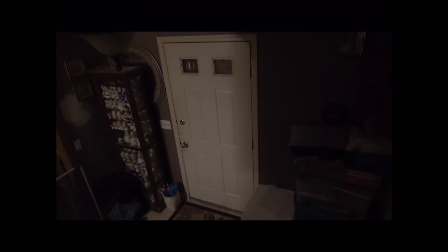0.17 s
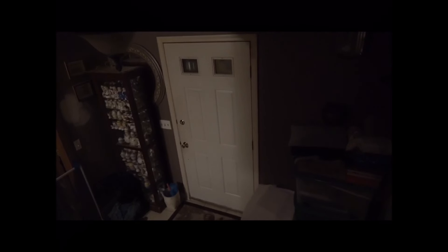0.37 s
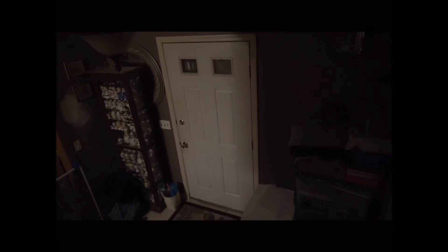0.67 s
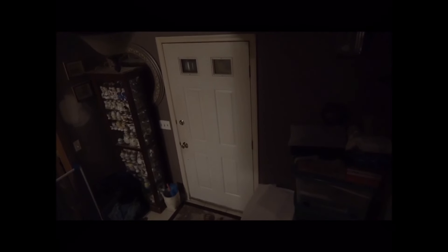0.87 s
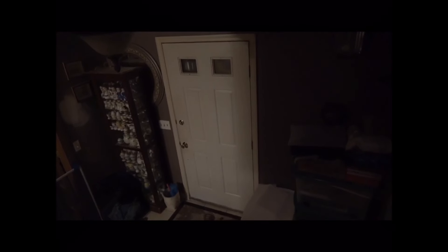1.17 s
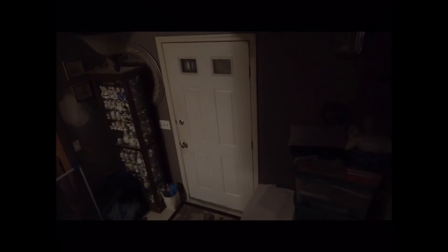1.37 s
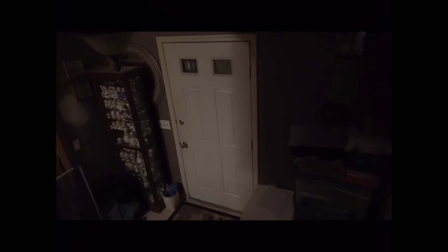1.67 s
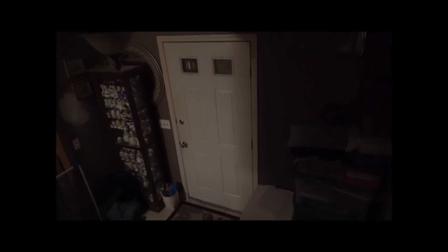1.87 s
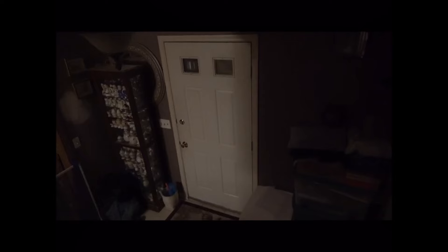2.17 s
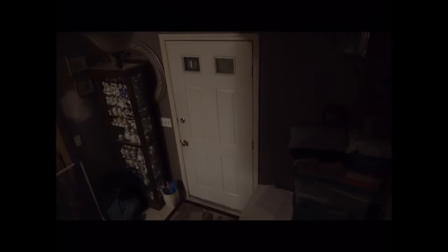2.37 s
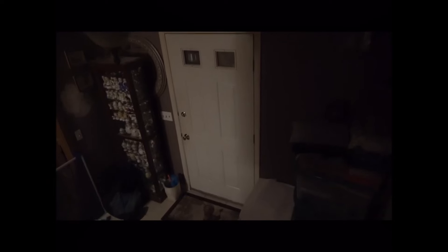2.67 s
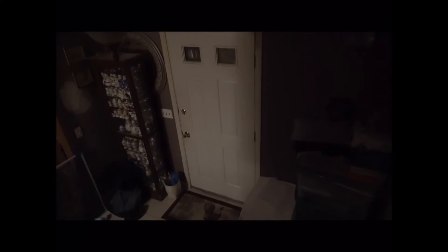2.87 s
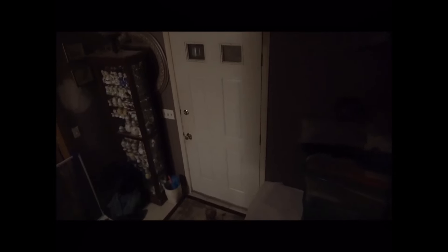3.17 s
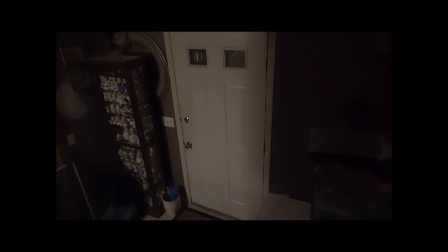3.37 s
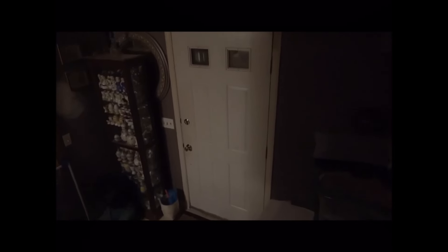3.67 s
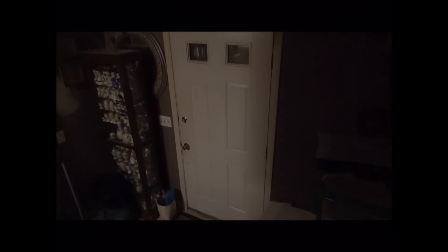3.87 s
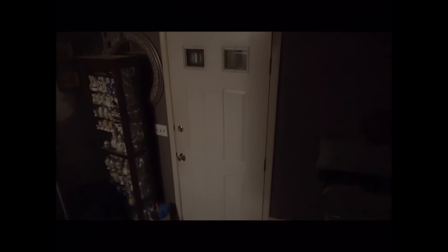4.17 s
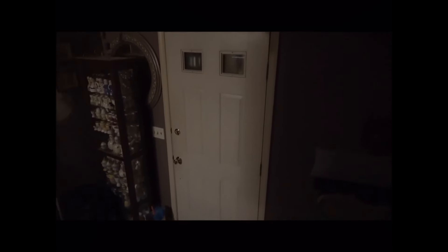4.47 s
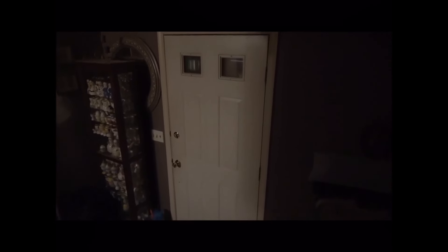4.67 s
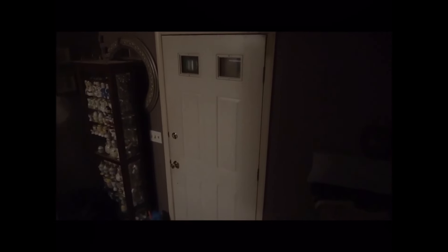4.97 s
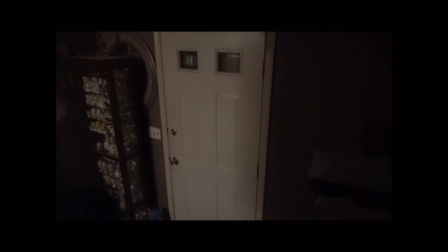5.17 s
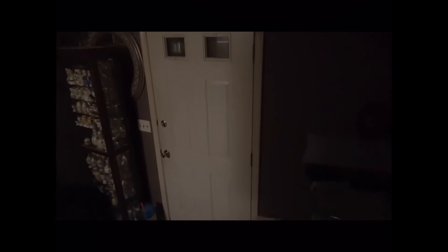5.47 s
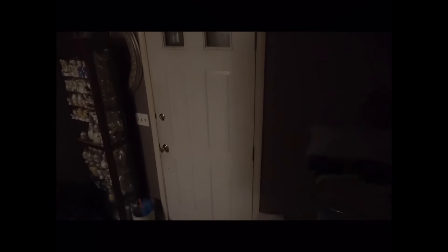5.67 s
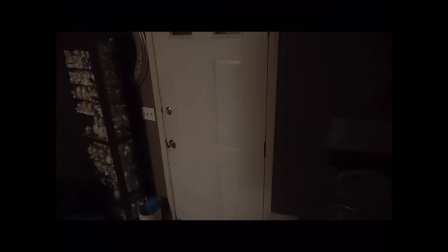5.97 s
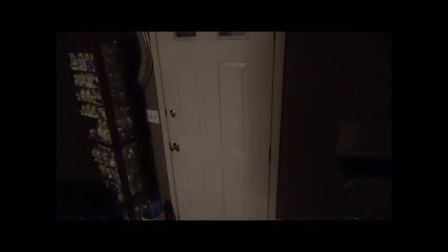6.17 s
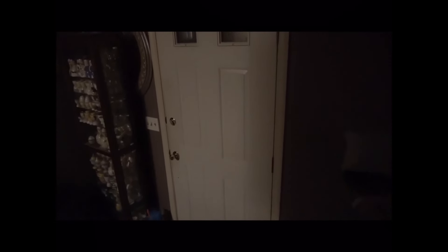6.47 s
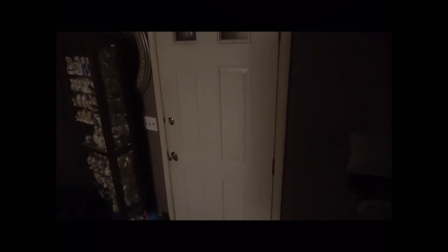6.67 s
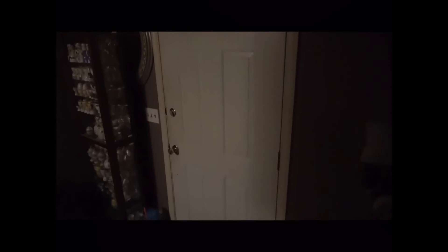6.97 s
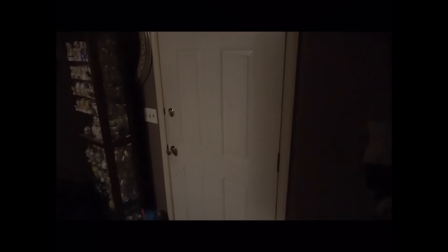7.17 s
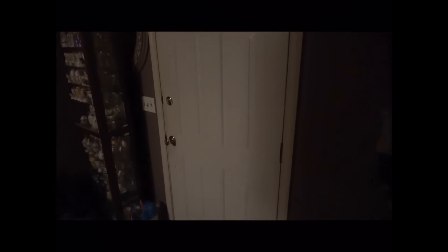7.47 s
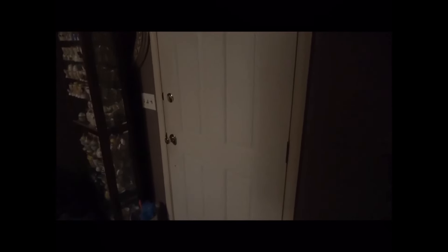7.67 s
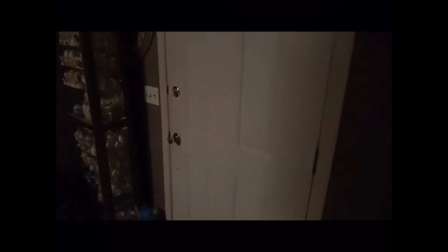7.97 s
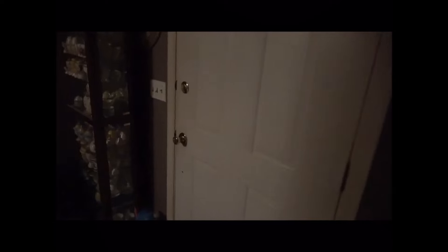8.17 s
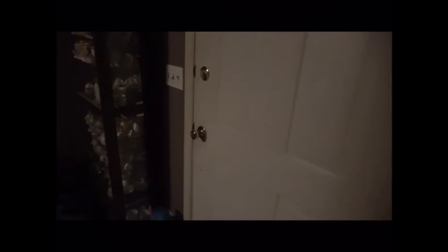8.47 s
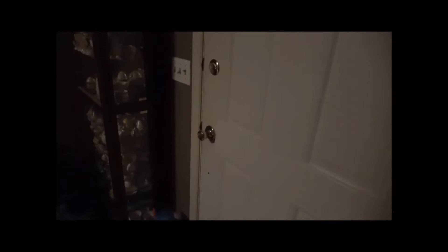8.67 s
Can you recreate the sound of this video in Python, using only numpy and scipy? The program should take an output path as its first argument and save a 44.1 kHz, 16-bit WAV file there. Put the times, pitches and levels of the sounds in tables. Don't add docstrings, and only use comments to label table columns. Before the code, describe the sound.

In a quiet house at night a distant fan hums softly under faint hiss. Knuckles knock on a hollow wooden door in three sets of three, about half a second apart, each with a low boom, woody ring and slight latch rattle. Between sets the listener walks closer with a handheld microphone, making soft steps, cloth rustle and small floor ticks. A single knock begins a fourth set at the end.

```python
import sys
import numpy as np
from scipy import signal
from scipy.fft import rfft, irfft, next_fast_len
from scipy.io import wavfile
from scipy.ndimage import uniform_filter1d, minimum_filter1d, map_coordinates

SR = 44100
rng = np.random.default_rng(int(sys.argv[2]) if len(sys.argv) > 2 else 0)


def bounce(signal):
    frames = np.transpose(np.atleast_2d(signal))
    limited = np.clip(frames, -1, 1)
    pcm = np.round(limited * 32767).astype(np.int16)
    wavfile.write(sys.argv[1], SR, pcm)


def voltage_ratio(level):
    return 10 ** (np.asarray(level, float) / 20)


N = 388521

# frequency in Hz, likeness 0 to 1.
CONTACT_ALIKE = [(200, 0.84), (600, 1), (1300, 0.99), (2800, 0.82), (5500, 0.71), (8000, 0.45),
                 (14000, 0.68)]
SIDES = np.array([[.5], [-.5]])


def unit(x):
    return x / np.sqrt(np.mean(x ** 2) + 1e-20)


def along(points, hz):
    f, v = np.transpose(points)
    return np.interp(np.log(hz + 1), np.log(f + 1), v)


def wobble(rate_hz):
    at = np.arange(0, N + 64, 64)
    knots = rng.standard_normal(int(N / SR * 40) + 4)
    slow = map_coordinates(knots, [at * min(rate_hz, 40) / SR])
    return np.interp(np.arange(N), at, slow)


def rush(spectrum, alike, size, lean=((1000, 0),)):
    hz = np.fft.rfftfreq(size, 1 / SR)
    turn = np.arccos(np.clip(along(alike, hz), -1, 1)) / 2
    noise = rfft(rng.standard_normal((2, size))) * voltage_ratio(along(spectrum, hz))
    mid, side = noise * [np.cos(turn), np.sin(turn)]
    pair = [mid + side, mid - side] * voltage_ratio(along(lean, hz) * SIDES)
    return unit(irfft(pair, size))


def bell(centre_hz, width_hz):
    hz = np.geomspace(50, 16000, num=300)
    peak_db = -10 * np.log10(1 + ((hz * hz - centre_hz ** 2) / (hz * width_hz)) ** 2)
    return np.transpose([hz, 1.57 * peak_db - 10 * (hz / 12000) ** 2])


def add(track, sound, s):
    part = track[:, round(s * SR):][:, :sound.shape[1]]
    part += sound[:, :part.shape[1]]


def background(spectrum, alike):
    return rush(spectrum, alike, next_fast_len(N))[:, :N]


def fan(t, opening_db, air_alike):
    # frequency in Hz, density in dB per Hz.
    blade_noise = [(100, -10), (170, -6.5), (246, -3.5), (266, -7.5), (285, -7), (470, -3), (516, -6.5),
                   (613, -5), (637, -8.5), (708, -2.5), (986, -11), (1250, -10.5), (4000, -37.5),
                   (5200, -34), (8800, -120)]
    # frequency in Hz, level in dB.
    motor_tones = [(86.1, -64), (118.4, -61), (242.2, -65), (479.1, -63.5), (597.5, -66), (694.4, -63.5),
                   (1270, -67.5)]
    level_db = -49.5 + opening_db + 0.38 * wobble(3.2) + 0.73 * wobble(1.56)
    blades = voltage_ratio(level_db) * background(blade_noise, air_alike)
    tones = 0
    for hz, db in motor_tones:
        phase = 2 * np.pi * hz * t + 1.01 * wobble(9)
        tones = tones + voltage_ratio(db + 1.4 * wobble(3.9)) * np.sin(phase)
    return blades + voltage_ratio(opening_db + 4) * tones


def footfalls(t, opening_db, air_alike):
    # time in seconds, hand jolt in dB, floor rumble in dB, both over standing level.
    steps = [(.52, 8, -4), (.93, 1, -7), (2.8, 1, -3), (3.12, 8, 2), (3.33, 16, -0.5), (5.1, 2, 4.5),
             (5.35, -8, 2), (5.7, 13, 3), (6.08, 9, 0), (7.55, 5, 0), (7.9, 7, -1), (8.2, 1, 0),
             (8.48, 4, 2)]
    # frequency in Hz, density in dB per Hz.
    hand_shake = [(12, -43), (22, -4), (45, -6), (65, 2), (100, -62.5)]
    # frequency in Hz, density in dB per Hz.
    floor_rumble = [(32, -49), (55, -9), (75, -10.5), (124, 6), (183, -8.5), (200, -16), (260, -58),
                    (440, -120)]
    half_length_s = 0.15
    coarse_s = t[::64]
    swells = 0
    for s, *db in steps:
        swells = swells + np.outer(db, np.exp(-((coarse_s - s) / half_length_s) ** 2))
    jolt_db, rumble_db = (np.interp(t, coarse_s, swell) for swell in swells)
    shake = voltage_ratio(-71 + jolt_db + 1.7 * wobble(4.9)) * background(hand_shake, [(30, 0.91)])
    level_db = -55 + 0.46 * opening_db + rumble_db - 2.5
    return shake + voltage_ratio(level_db) * background(floor_rumble, air_alike)


def clothes(t, air_alike):
    # time in seconds, clothes level in dB.
    motion = [(0, -72), (.9, -73), (2.4, -66), (2.85, -61), (2.95, -65), (3.3, -59), (3.6, -64), (4.9, -65),
              (5.1, -60), (5.45, -65.5), (5.65, -57.5), (6.05, -60.5), (6.2, -63.5), (7.5, -62.5),
              (7.8, -60), (8.15, -63.5), (8.36, -62), (8.8, -66)]
    # frequency in Hz, density in dB per Hz.
    fabric = [(880, -42), (1500, -21), (1690, -3.5), (1880, -6.5), (9620, -17.5), (14900, -23),
              (15500, -38)]
    at_s, level_db = np.transpose(motion)
    rustle_db = np.interp(t, at_s, level_db) + 1.0 * wobble(12)
    return voltage_ratio(rustle_db) * background(fabric, air_alike)


def microphone_hiss(air_alike):
    # frequency in Hz, density in dB per Hz.
    hiss = [(880, -36), (1500, -20), (2240, -9), (2720, -10.5), (3190, -10.5), (5200, -14.5), (7180, -19),
            (15500, -23)]
    return voltage_ratio(-69.5 + 2.0) * background(hiss, air_alike)


def house():
    # frequency in Hz, likeness 0 to 1.
    air_alike = [(60, 1), (200, 0.82), (640, 0.86), (1410, 0.93), (3100, 0.85), (5500, 0.66), (7000, 0.25),
                 (15000, 0.21)]
    t = np.arange(N) / SR
    opening_db = -4.5 * np.exp(-t / 1.42)
    moving = footfalls(t, opening_db, air_alike) + clothes(t, air_alike)
    return moving + fan(t, opening_db, air_alike) + microphone_hiss(air_alike)


def scuffs():
    # start in seconds, level in dB, centre in Hz, width in Hz, t60 in seconds.
    floor_noises = [(0.278, -57, 900, 900, .04), (2.395, -47, 1100, 1500, 0.11),
                    (2.413, -44, 370, 200, 0.1), (2.545, -45, 440, 120, .07),
                    (2.56, -56.5, 2200, 120, 0.17), (2.858, -53, 2850, 150, .1),
                    (3.2854, -32.5, 700, 550, 0.015), (3.286, -39, 4000, 8000, .013),
                    (3.36, -41, 320, 310, 0.038), (4.42, -40.5, 400, 440, 0.13),
                    (5.877, -40.5, 1600, 510, .03), (7.594, -39.5, 1100, 400, 0.11),
                    (7.592, -49, 4000, 6600, 0.18), (7.62, -44.5, 2030, 220, 0.076),
                    (7.622, -48, 3100, 6800, .09), (7.806, -44, 550, 450, 0.22), (7.66, -50, 302, 300, .6),
                    (7.74, -60, 3430, 200, 0.99), (7.82, -63, 3450, 250, .6), (7.44, -48, 700, 250, 0.064),
                    (7.869, -48, 71, 40, 0.2), (7.89, -56, 480, 250, 0.061)]
    # start in seconds, level in dB.
    contacts = [
        (4.393, -36),
        (4.403, -35.5),
        (4.423, -48),
    ]
    # centre in Hz, width in Hz, level in dB.
    resonances = [(990, 900, -7), (2540, 150, -7.5), (3100, 290, -8), (4540, 300, -11), (7000, 280, -13),
                  (5000, 11000, -3.5)]
    out, t = np.zeros((2, N)), np.arange(8192) / SR

    def puff(s, db, centre_hz, width_hz, rise_s, t60_s):
        noise = rush(bell(centre_hz, width_hz), CONTACT_ALIKE, len(t))
        add(out, voltage_ratio(db - 60 * t / t60_s) * (1 - np.exp(-t / rise_s)) * noise, s)

    for s, db, centre_hz, width_hz, t60_s in floor_noises:
        puff(s, db, centre_hz, width_hz, 0.017 * t60_s, t60_s)
    for s, db in contacts:
        for centre_hz, width_hz, level_db in resonances:
            puff(s, db + level_db + rng.normal(0, 1.7), centre_hz, width_hz, 0.0023, 0.16)
    return out


def low_boom(t, boom_db, slab_db):
    mode_hz = [30.5, 72, 86, 98, 124, 137, 153.5, 210, 225, 239.5, 278, 352]
    # level in dB, t60 in seconds, build-up in seconds, left-right difference in dB.
    modes = [(-22.5, 0.7, .04, 1), (-10, 0.46, 0.066, -4), (1, 0.28, 0.01, 0.5), (-9, 0.36, 0.013, 1),
             (-1, 0.55, 0.039, 4), (7, 0.19, 0.024, 2), (3.5, 0.4, 0.04, 3), (-1.5, 0.202, 0.011, 3),
             (-24, 0.16, 0.028, -6), (-6, 0.36, 0.01, 5.5), (-17, 0.16, 0.013, 22), (-2.5, 0.21, 0.017, -1)]
    push_lag_s = .0026
    boom = 0
    for hz, (level_db, t60_s, rise_s, pan_db) in zip(mode_hz, modes):
        source_db = boom_db if hz < 180 else slab_db
        start_db = level_db + source_db + rng.normal(0, 0.87) + pan_db * SIDES
        envelope = voltage_ratio(start_db - 60 * t / t60_s) * (1 - np.exp(-t / rise_s)) ** 2
        boom = boom + envelope * np.cos(2 * np.pi * hz * (t - push_lag_s))
    return boom


def panel_modes(t):
    # frequency in Hz, level in dB, t60 in seconds.
    modes = [(529, -9, 0.41), (660, 4, 0.067), (657, -30, 0.38), (800, -7, 0.39), (866, -5, 0.34),
             (846, -7.5, 0.091), (1124, -8, 0.26), (1020, -19, 0.39), (1112, 3.5, 0.26), (1220, 8, 0.18),
             (1301, 3, 0.16), (1360, 4, 0.12), (1620, -23.5, 0.14), (1590, -7.5, 0.29), (1798, -8.5, 0.2),
             (2280, -11.5, 0.14)]
    panel = 0
    for hz, level_db, t60_s in modes:
        start_db = level_db + rng.normal(0, 2.3) + rng.normal(1.6, 0.91) * SIDES
        cycles = hz * rng.normal(1, 0.0056) * t + rng.random()
        phase = 2 * np.pi * cycles + rng.normal(0, 0.66) * SIDES
        panel = panel + voltage_ratio(start_db - 60 * t / t60_s) * np.sin(phase)
    return panel


def hall_ring(t, colour, lean):
    # frequency in Hz, t60 in seconds.
    hall_decay = [(200, 0.29), (600, 0.22), (1200, 0.32), (3000, 0.22), (8000, 0.26), (15000, 0.2)]
    noise = rush([(70, -59), *colour], CONTACT_ALIKE, len(t), lean)
    hz, frame_s, z = signal.stft(noise, SR, nperseg=256)
    fade = voltage_ratio(-60 * frame_s / along(hall_decay, hz)[:, None])
    return signal.istft(z * fade, SR, nperseg=256)[1][:, :len(t)]


def hollow_swell(t, swell_hz, lean):
    noise = rush(bell(swell_hz, 307), CONTACT_ALIKE, len(t), lean)
    return noise * (t / 0.053) ** 2 * np.exp(-2 * t / 0.035)


def knuckle_snap(t):
    colour = [(500, -20), (1500, 16), (5000, -4), (10000, -12), (15000, -30)]
    snap = rush(colour, CONTACT_ALIKE, len(t)) * voltage_ratio(-60 * t / 0.015)
    crack = rush(bell(2500, 1700), CONTACT_ALIKE, len(t)) * voltage_ratio(-60 * t / 0.27)
    crack = crack * (1 - np.exp(-t / 0.0014))
    return voltage_ratio(-10) * snap + voltage_ratio(-12.5) * crack


def wall_bumps(t):
    # delay in seconds, level in dB.
    echoes = [
        (.035, 2),
        (.048, -1),
        (.061, -3),
    ]
    bumps = 0
    for lag_s, level_db in echoes:
        after_s = t - lag_s
        shape = (1 - (after_s / 0.0011) ** 2) * np.exp(-.5 * (after_s / 0.00074) ** 2)
        bumps = bumps + voltage_ratio(level_db) * shape
    return voltage_ratio(3 + 0.98 * SIDES) * bumps


def frame_shake(t, lean):
    colour = [(100, -8), (280, 8.5), (600, -11), (1100, -0.5), (2000, -18), (15000, -49.0)]
    swell = np.sin(np.pi * np.clip(t / 0.053, 0, 1)) ** 2
    return rush(colour, CONTACT_ALIKE, len(t), lean) * swell


def door():
    blows_s = [
        1.0474,
        1.4774,
        1.9382,
        3.5618,
        4.0462,
        4.4936,
        6.1646,
        6.5776,
        7.0364,
        8.5978,
    ]
    # knuckle in dB, then hall boom, slab and latch rattle in dB relative to it.
    blow_levels = [(-20, -4, -1.5, -1), (-23, -0.5, -6, 2.5), (-19.5, -2.5, -4, 1.5), (-21, -3.5, -2.5, -1),
                   (-21.5, -4, -3.5, 1.5), (-18.5, -2.5, -5.5, 3), (-19, -3, -3, 2.5), (-24.5, 3, 4.5, 11),
                   (-20, -0.5, -1.5, 9), (-20, 1.5, 1, 10.5)]
    # snap in dB, early frame shake in dB, wood build-up in seconds.
    touches = [
        (-2.5, -2.5, 0.0043),
        (-7.5, 0, 0.0018),
        (-9, 2.5, 0.0033),
    ]
    # frequency in Hz, level in dB.
    spots = [
        (590, 0.5),
        (626, -1),
        (430, 0),
        (395, 2),
    ]
    # frequency in Hz, density in dB per Hz.
    slab = [(110, 6.5), (180, 3.5), (377, 6.5), (461, -7.5), (597, 1), (735, -33), (1000, -34), (1300, -15),
            (2200, -120)]
    # frequency in Hz, density in dB per Hz.
    edge = [(530, -7.5), (900, -5), (1210, 2.5), (1330, -2.5), (1690, -5), (2140, -16.5), (2430, -33.5),
            (4000, -58), (5200, -72), (8800, -120)]
    # frequency in Hz, density in dB per Hz.
    latch_metal = [(1470, -44), (2500, -4), (2850, -4.5), (7010, -7), (8420, -13), (13800, -16.5),
                   (15500, -27)]
    # frequency in Hz, left-right difference in dB.
    lean = [(200, 6), (350, 7.5), (600, 1.5), (1300, -0.3), (2800, 3.2), (8000, 0.5)]
    out, t = np.zeros((2, N)), np.arange(20480) / SR
    for k, (s, (db, boom_db, slab_db, latch_db)) in enumerate(zip(blows_s, blow_levels)):
        group, place = divmod(k, 3)
        snap_db, early_db, build_s = touches[place]
        swell_hz, spot_db = spots[group]

        low_ring = hall_ring(t, slab, lean) * (1 - 0.41 * np.exp(-t / 0.11))
        wood = voltage_ratio(-5 + 0.5) * panel_modes(t)
        wood = wood + voltage_ratio(slab_db + 10) * low_ring + voltage_ratio(2.0) * hall_ring(t, edge, lean)
        wood = wood + voltage_ratio(boom_db + spot_db - 1.8 + 24.5) * hollow_swell(t, swell_hz, lean)
        latch = hall_ring(t, latch_metal, lean) * (1 - np.exp(-(t / 0.012) ** 2))

        air = voltage_ratio(8.5) * low_boom(t, boom_db, slab_db) + wood * (1 - np.exp(-t / build_s))
        air = air + voltage_ratio(latch_db - 19.0) * latch + voltage_ratio(snap_db) * knuckle_snap(t) + wall_bumps(t)
        add(out, voltage_ratio(db) * air, s)
        add(out, voltage_ratio(db + early_db - 4.5) * frame_shake(t, lean), s - .017)
    return out


def scene():
    return house() + scuffs() + door()


def compress(x):
    attack, hold = round(.005 * SR), round(.014 * SR)
    loudness = np.sqrt(np.abs(uniform_filter1d((x ** 2).max(0), attack)) + 1e-12)
    need = np.minimum(1, voltage_ratio(-17.5) / loudness) ** .9
    held = minimum_filter1d(need, hold, origin=(hold - 1) // 2)
    return x * uniform_filter1d(held, attack)


def narrow(x):
    # frequency in Hz, side level in dB.
    width = [(1750, 0), (2200, -12), (4950, -14), (5150, 0), (12500, -1), (14200, -12)]
    size = next_fast_len(N)
    hz = np.fft.rfftfreq(size, 1 / SR)
    left, right = rfft(x, size) * (hz < 15700)
    mid = (left + right) / 2
    side = (left - right) / 2 * voltage_ratio(along(width, hz))
    return irfft([mid + side, mid - side], size)[:, :N]


def roll_off(x):
    return signal.sosfilt(signal.butter(12, 15690, fs=SR, output="sos"), x)


def record(dry):
    return roll_off(narrow(compress(dry)))


dry = scene()
out = record(dry)
bounce(out)
```